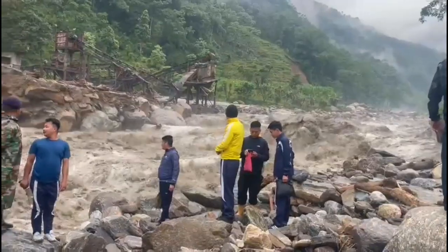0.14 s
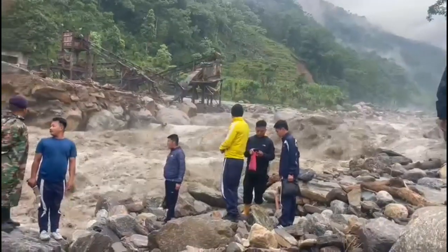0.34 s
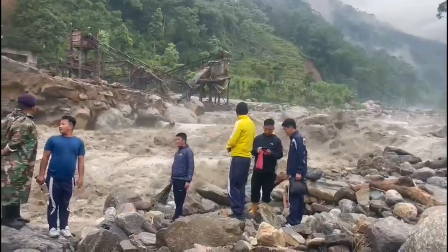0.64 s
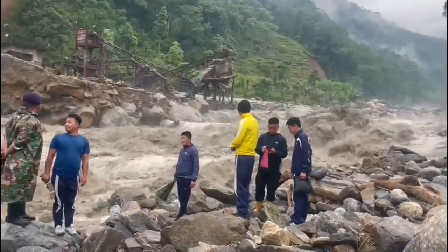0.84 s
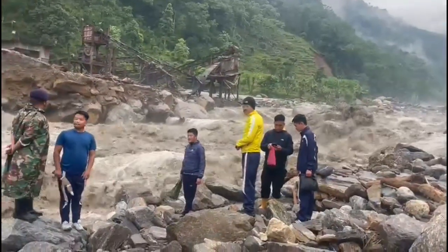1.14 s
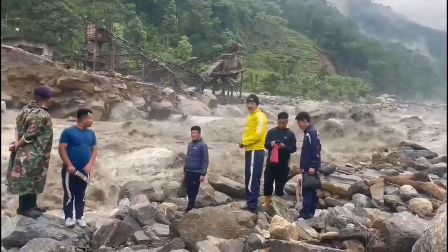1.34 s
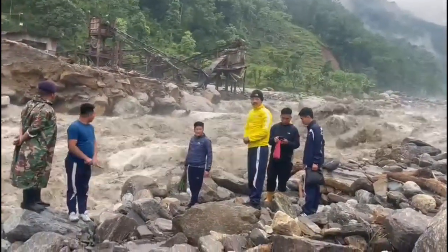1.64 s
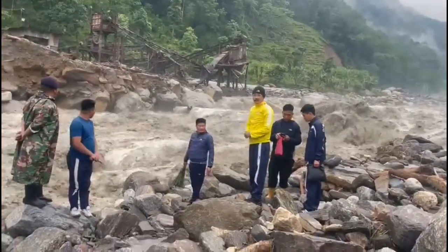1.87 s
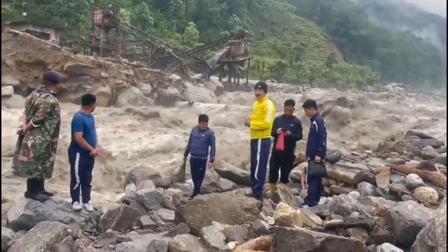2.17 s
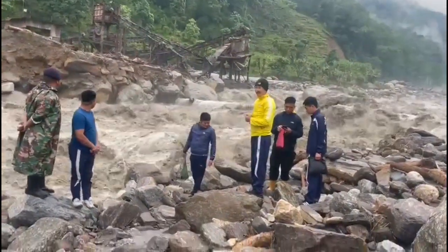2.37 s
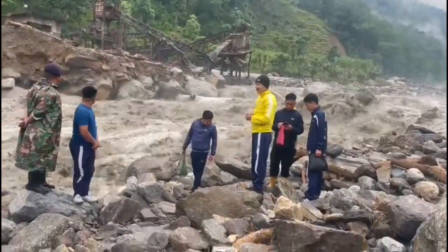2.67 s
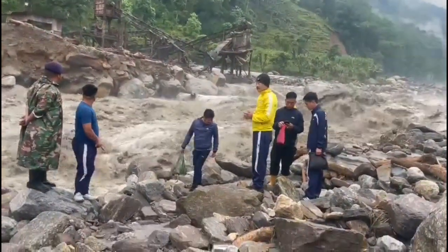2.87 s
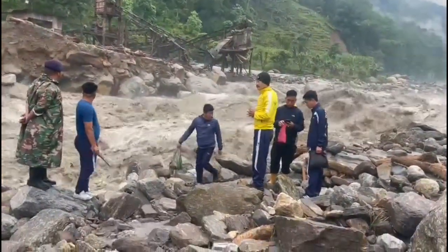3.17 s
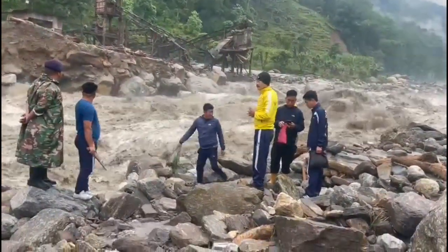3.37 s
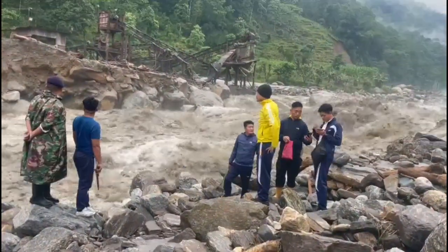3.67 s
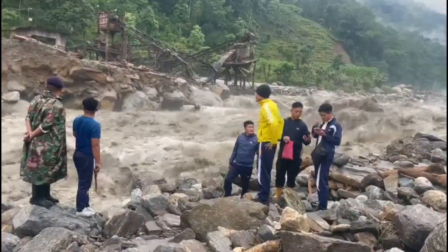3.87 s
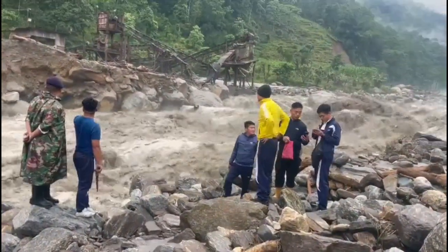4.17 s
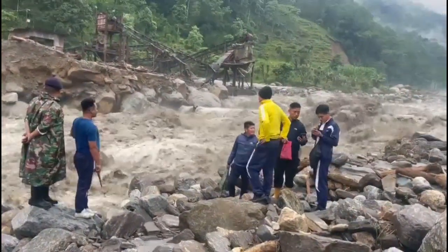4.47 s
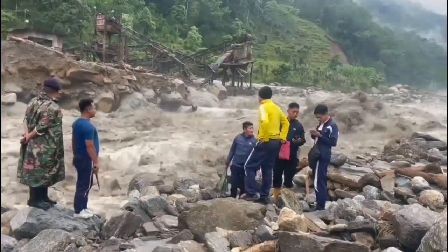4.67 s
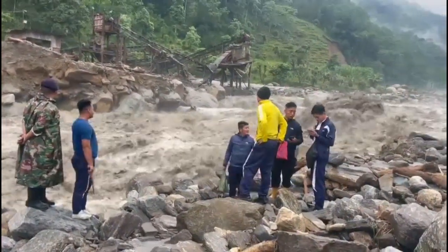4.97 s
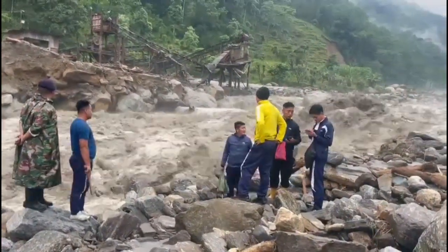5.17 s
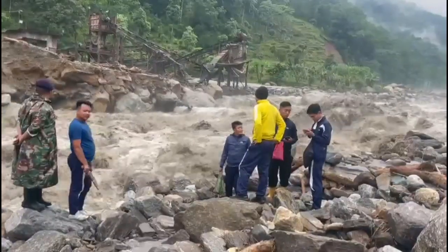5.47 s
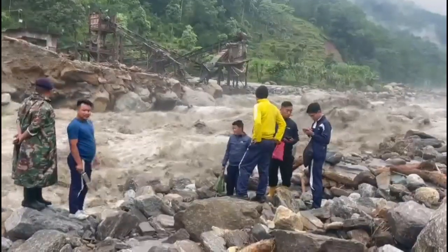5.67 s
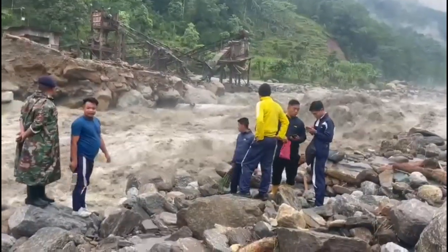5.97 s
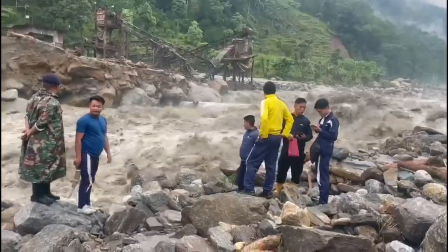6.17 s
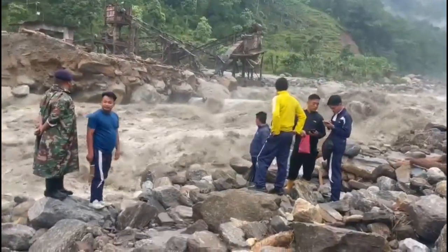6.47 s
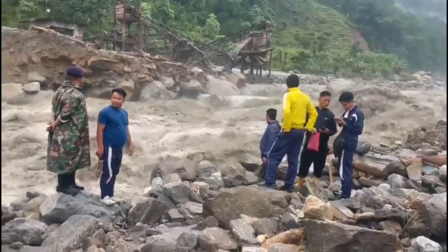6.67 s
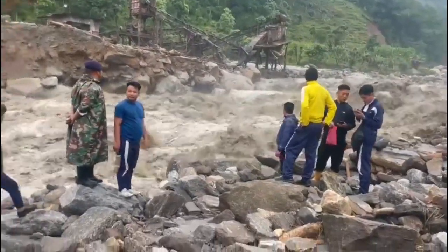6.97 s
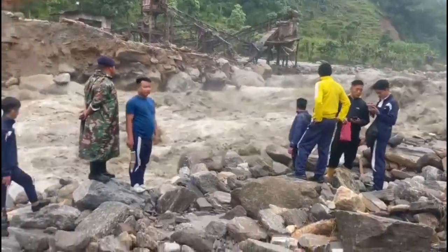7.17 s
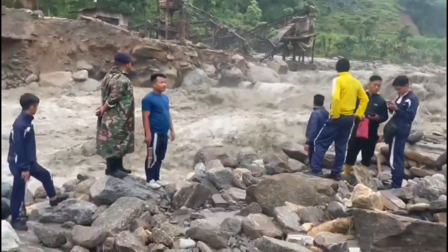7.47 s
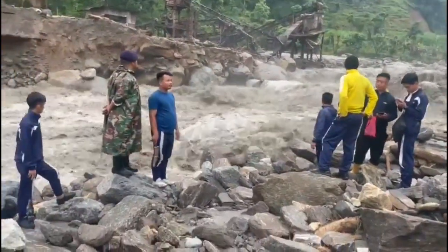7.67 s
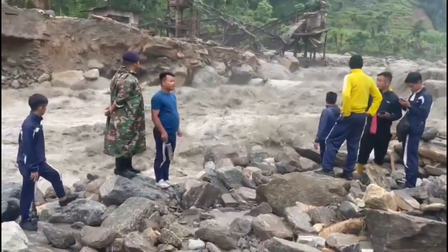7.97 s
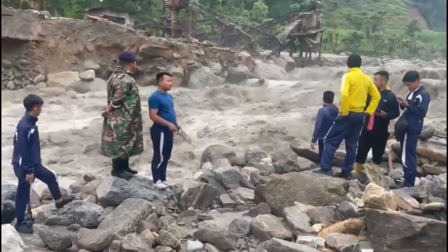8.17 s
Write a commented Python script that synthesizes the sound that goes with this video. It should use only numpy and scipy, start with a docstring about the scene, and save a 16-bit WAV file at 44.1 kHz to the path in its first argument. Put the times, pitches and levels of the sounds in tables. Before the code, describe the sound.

For about 8.3 seconds a muddy river in flood thunders past a boulder-strewn bank, picked up in stereo by a phone nearby. A deep, wavering low roar dominates from start to end, filled with dull thuds and short low booms as heavy waves strike rock, for example near 0.7, 1.5, 3.6, 4.5, 6.6 and 7.7 seconds. Above it, white water churns evenly with many small gurgles; very faint hollow notes briefly surface near 0.5, 1.4 and 3.9 seconds. Thinner and quieter on top, crests hiss, splash and patter. The roar eases slightly near 1.9 seconds, swells around 2.4, then varies gently, lifting again near 7.1 and at the end. At about 3.4 seconds everything cuts out for roughly a twentieth of a second and snaps back. The highest treble is missing.

```python
"""On the rocky bank of a muddy river in flood, heard through a phone's two ports.
Falling waves throb and boom as wavering low noise, thuds and short low tones that fade quickly.
White water rushes (flickering noise) and gurgles (bubble rings rising in pitch), with a few hollow notes.
Crests hiss (high noise), splash (bursts that drain away) and patter (tiny rings).
The flow is steady; once the sound cuts out for an instant."""
import sys
import numpy as np
from scipy import signal
from scipy.fft import rfft, irfft
from scipy.io import wavfile
from scipy.ndimage import uniform_filter1d

SR = 44100
rng = np.random.default_rng(int(sys.argv[2]) if len(sys.argv) > 2 else 0)


def master(y):
    """Save y as 16-bit WAV."""
    cut = np.clip(np.atleast_2d(y).T, -1, 1)
    pcm = np.round(cut * 32767)  # scale
    wavfile.write(sys.argv[1], SR, pcm.astype(np.int16))


N = 366912  # samples
TIME = np.arange(N) / SR  # s
FREQ = np.arange(N // 2 + 1) * SR / N  # Hz
PLUNGE_TOP_HZ, CHURN_TOP_HZ, TOP_HZ = 200, 1700, 11450  # upper edges of roar, churn and everything


def undb(db):
    """Turn decibels into gain."""
    return 10 ** (np.asarray(db) / 20)


def unit(x):
    """Scale to an average (rms) strength of 1."""
    return x / np.sqrt(np.mean(x ** 2))


def across(table):
    """Spread each column of a table that starts with pitch_hz over every frequency."""
    hz, *columns = np.transpose(table)
    return [np.interp(np.log(FREQ + 1), np.log(hz), column) for column in columns]


def band(lo_hz, hi_hz, order=8):
    """Gain of a band with soft edges; neighbouring bands add up to even power."""
    low_edge = 1 + (lo_hz / (FREQ + 1)) ** order
    high_edge = 1 + (FREQ / hi_hz) ** order
    return 1 / np.sqrt(low_edge * high_edge)


def walk(rate):
    """Wander at random: `rate` new levels per second, smoothed twice, with spread 1."""
    hold = int(SR / rate)  # samples
    levels = np.repeat(rng.standard_normal(N // hold + 2), hold)
    levels = levels[rng.integers(hold):][:N]
    return unit(uniform_filter1d(uniform_filter1d(levels, hold), hold))


def turbulence(lo_hz, hi_hz, swell_db, flicker_db, flicker_rate, count):
    """Countless merged bubbles: each size class flickers alone, and all swell together."""
    edges = np.geomspace(lo_hz, hi_hz, count + 1)
    out = 0
    for lo, hi in zip(edges, edges[1:]):
        noise = rng.standard_normal((2, N))
        cloud = irfft(rfft(noise) * band(lo, hi), N)
        out = out + cloud * undb(flicker_db * walk(flicker_rate))
    return unit(out * undb(swell_db * walk(flicker_rate / 2)))


def grains(lo_hz, hi_hz, cycles, glide, spread_db, count):
    """Single damped rings at random moments and places; most are small, a few are large."""
    out = np.zeros((2, N + SR))
    for when, pitch, size, place in rng.random((count, 4)):
        hz = lo_hz + (hi_hz - lo_hz) * pitch
        length = min(int(cycles * SR / hz) + 2, SR)
        turns = np.arange(length) * hz / SR
        age = turns / cycles
        fade = np.exp(-np.log(100) * age)  # 40 dB down at age 1
        # the pitch climbs by the share `glide` up to age 1
        ring = np.sin(2 * np.pi * turns * (1 + glide * age / 2)) * fade
        gain = np.sqrt(hz) * undb(spread_db * size ** 2)  # sqrt makes up for shorter high rings
        start, angle = int(when * N), 2 * np.pi * place
        out[:, start:start + length] += gain * np.outer([np.cos(angle), np.sin(angle)], ring)
    return unit(out[:, :N])


# Tone colour of the river at the bank; only its shape counts: pitch_hz, level_db (per Hz)
RIVER_COLOUR = [(25, -21.5), (35, -16.5), (56, -0.5), (75, -.2), (110, -2.8), (150, -4.9), (215, -10.4),
                (320, -14.3), (400, -15.9), (680, -17.3), (820, -18.8), (1000, -21.4), (1500, -24.6),
                (1800, -26.7), (2000, -25.7), (2650, -27), (3050, -29), (4000, -30.7), (5000, -32.6),
                (6000, -33.4), (7000, -33.7), (9100, -36.6), (9700, -39), (10700, -42), (11400, -46.5)]
# How the two ports differ in a wide field of sound:
# pitch_hz, likeness (0 to 1), left_lead_radians, left_minus_right_db
PORT_DIFFERENCES = [(55, 0.998, 0, 0), (130, 0.985, 0.08, 0.4), (300, 0.86, 0.29, 0.6),
                    (650, 0.61, 0.72, 3.1), (1150, 0.44, 0.95, 3.3), (1450, 0.15, 0.3, 3),
                    (1800, 0.42, -0.52, -3.1), (2100, 0.98, 0, 0.1), (2600, 0.94, 0.08, 0.4),
                    (3250, 0.65, 0.6, 3.6), (4400, 0.98, 0.02, 0.8), (5350, 0.93, -0.03, 0.5),
                    (6300, 0.2, -0.6, 3), (6450, 0.6, -2.6, 2), (6650, .93, -3.1, .6), (6850, 1, -3.14, 0),
                    (8300, 1, -3.14, 0), (8780, .97, -3.35, 0), (9150, 0.53, -4.7, 0.3),
                    (9900, 0.995, -6.28, 0)]


def at_bank(water, reach, core):
    """Colour a layer and pick it up at both ports; the core band of their average has rms 1."""
    colour_db, = across(RIVER_COLOUR)
    likeness, lead, balance_db = across(PORT_DIFFERENCES)
    likeness = np.clip(likeness, 0, 1)
    shared, apart = rfft(water) * undb(colour_db) * reach
    # long waves reach both ports alike; shorter ones differ in phase and strength
    shared = shared * np.sqrt(1 + likeness)
    apart = apart * np.sqrt(1 - likeness)
    lean = undb(balance_db / 2) * np.exp(.5j * lead)
    left = (shared + apart) * lean
    right = (shared - apart) / lean
    middle = irfft((left + right) / 2 * core, N)
    return irfft([left, right], N) / np.std(middle)


SPLASH_DB = -9.5  # splashes against the hiss
SPLASH_DECAY_S, SPLASH_SPREAD_DB = 0.017, 4.5  # time for power to fall to 37 %; range of sizes


def splashes(count):
    """Level of many overlapping splashes: each starts at once and drains away."""
    when, size = rng.random((count, 2)).T
    power = undb(SPLASH_SPREAD_DB * size ** 2) ** 2
    starts = np.bincount((when * N).astype(int), power, N)
    keep = np.exp(-1 / (SPLASH_DECAY_S * SR))  # share of power left after each sample
    return unit(np.sqrt(signal.lfilter([1], [1, -keep], starts)))


def spray():
    """Foam hisses on the crests, splashes burst in clumps and droplets patter back onto the water."""
    hiss = turbulence(880, 13900, swell_db=0.3, flicker_db=1.2, flicker_rate=60, count=20)
    bursts = 0
    for lo in (1400, 2800, 5600):  # each octave splashes on its own
        sheet = turbulence(lo, 2 * lo, swell_db=.5, flicker_db=1.0, flicker_rate=65, count=2)
        bursts = bursts + sheet * splashes(count=600)
    droplets = grains(1350, 11360, cycles=12, glide=.1, spread_db=8, count=8000)
    fizz = grains(1500, 6500, cycles=270, glide=0.016, spread_db=10.5, count=3500)
    water = hiss + undb(SPLASH_DB) * unit(bursts) + undb(-13.0) * droplets + undb(-11.5) * fizz
    return at_bank(water, band(CHURN_TOP_HZ, SR), band(2000, 6000))


def churn():
    """White water rushes between the boulders; larger bubbles ring out, rising in pitch."""
    rush = turbulence(93.0, 3420, swell_db=0.08, flicker_db=1.0, flicker_rate=26, count=22)
    gurgles = grains(300, 1802, cycles=69, glide=0.052, spread_db=10.5, count=2200)
    water = rush + undb(-11) * gurgles
    return at_bank(water, band(PLUNGE_TOP_HZ, CHURN_TOP_HZ), band(200, 1500))


NOTE_WAVER = 0.0144  # share of the pitch
# Hollow notes that stand out of the churn for a moment: middle_s, length_s, pitch_hz, level_db
NOTES_IN_CHURN = [(0.488, .12, 622, -29), (1.367, 0.12, 540, -30), (3.91, 0.14, 496, -26)]


def hollow_notes():
    """Faint, slightly wavering tones that swell and sink back into the water."""
    out = 0
    for middle, length, hz, db in NOTES_IN_CHURN:
        turns = np.cumsum(hz * (1 + NOTE_WAVER * walk(30.1))) / SR
        swell = np.exp(-2 * ((TIME - middle) / length) ** 2)
        out = out + undb(db) * swell * np.sin(2 * np.pi * turns)
    return out


def plunge():
    """Big air pockets throb under falling waves, with dull thuds of water on rock."""
    throb = turbulence(16.0, 390, swell_db=0.0, flicker_db=-0.1, flicker_rate=19, count=3)
    thuds = grains(39.0, 313, cycles=5.4, glide=.05, spread_db=9.5, count=900)
    roar = at_bank(throb + undb(-12) * thuds, band(14, PLUNGE_TOP_HZ), band(30, 200))
    # so many waves fall at once that their total power stays nearly even
    power = uniform_filter1d(np.mean(roar ** 2, axis=0), size=SR // 8)
    power = uniform_filter1d(power, size=SR // 16)
    return unit(roar / power ** 0.33)


BOOM_DB = -2.6  # added to every boom
BOOM_RISE_CYCLES, BOOM_GLIDE = 1, 0.015  # cycles up to the peak; share of pitch gained per rise time
# The heaviest waves slam down on rock: start_s, level_db (at the peak, before BOOM_DB),
# pitch_hz (at the start)
HEAVY_WAVES = [(0.312, -11, 59), (0.383, -10.5, 83), (0.71, -6.5, 90), (0.878, -8.5, 80), (0.927, -9, 75),
               (1.206, -9.5, 87), (1.5, -9, 92.5), (2.192, -10.5, 78), (2.457, -10, 80), (2.544, -10, 79),
               (2.954, -10, 87.5), (3.621, -7.5, 106), (3.838, -12, 83), (3.925, -12.5, 57),
               (3.99, -16, 48), (4.286, -8, 90), (4.488, -7, 114), (4.641, -9.5, 73.6), (5.141, -12, 104),
               (5.233, -12, 59), (5.792, -13, 61), (5.964, -9, 76), (6.225, -8, 91), (6.484, -10, 103),
               (6.573, -7.5, 129), (6.95, -9, 84), (7.207, -11, 98.4), (7.521, -8.5, 77.4),
               (7.666, -8, 139), (7.786, -17, 103), (7.831, -9, 80), (8.061, -12, 106), (8.179, -8.5, 83)]


def booms():
    """Each heavy wave traps a pocket of air that throbs for a few cycles, alike at both ports."""
    out = 0
    for start, db, hz in HEAVY_WAVES:
        turns = np.maximum(TIME - start, 0) * hz
        age = np.minimum(turns / BOOM_RISE_CYCLES, 20)
        swell = age ** 2 * np.exp(2 - 2 * age)  # peaks at age 1
        throb = np.sin(2 * np.pi * turns * (1 + BOOM_GLIDE * age / 2))
        out = out + undb(db) * swell * throb
    return out * undb(BOOM_DB)


CHURN_DB, SPRAY_DB = -25, -32.5
SURGE_DB, SURGES_PER_S = 0.5, 26  # single waves lift and drop the roar at random
# Slow swell of the flow, as the level of the deep roar before surges: time_s, level_db
FLOW_SWELL = [(0, -19.5), (.6, -19.5), (1.4, -20.6), (1.85, -21.5), (2.4, -18.5), (3.25, -20.5),
              (3.8, -20.5), (4.4, -19.5), (5.1, -20), (6.25, -20.5), (7.1, -19), (7.7, -20.5), (8.3, -19)]


def scene():
    """The roar swells with the flow and surges wave by wave; white water and spray run on evenly."""
    flow_db = np.interp(TIME, *np.transpose(FLOW_SWELL))
    roar_db = flow_db + SURGE_DB * walk(SURGES_PER_S)
    deep = plunge() * undb(roar_db) + booms()
    return deep + churn() * undb(CHURN_DB) + hollow_notes() + spray() * undb(SPRAY_DB)


CUT_S, CUT_LENGTH_S, EDGE_S = 3.3955, .047, .002  # start, length, and ramp on either side
CUT_DROP_DB, CUT_FADE_S = -19, .028  # first drop, then a further 60 dB down in this time


def cut_out():
    """Gain of the brief gap: a sudden drop, an ever faster fade to silence, an abrupt return."""
    age = TIME - CUT_S
    fading = undb(CUT_DROP_DB - 60 * (age / CUT_FADE_S) ** 2)
    outside = np.clip(np.maximum(-age, age - CUT_LENGTH_S) / EDGE_S, 0, 1)
    return np.maximum(fading, outside)


def record(dry):
    """The sound cuts out once, and a steep filter removes the treble above TOP_HZ."""
    treble_cut = signal.ellip(10, .1, 80, TOP_HZ, fs=SR, output="sos")
    return signal.sosfilt(treble_cut, dry * cut_out())


dry = scene()
out = record(dry)
master(out)
```